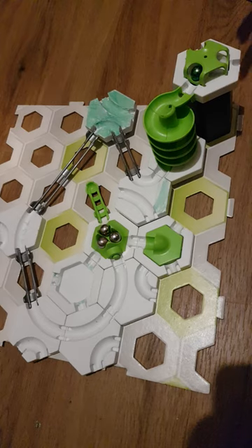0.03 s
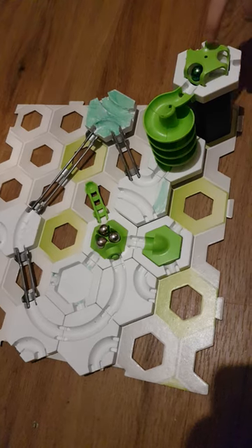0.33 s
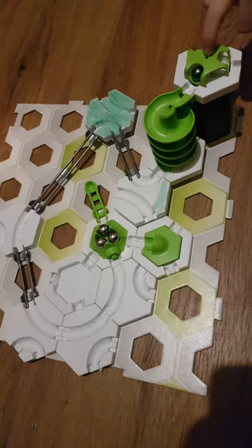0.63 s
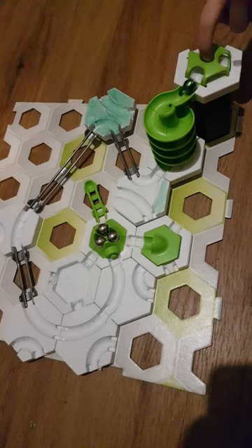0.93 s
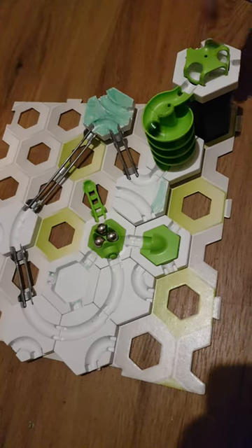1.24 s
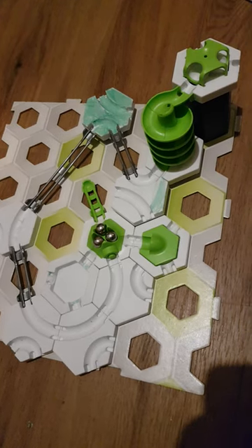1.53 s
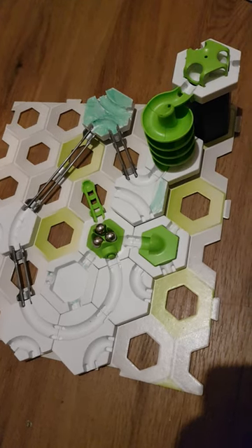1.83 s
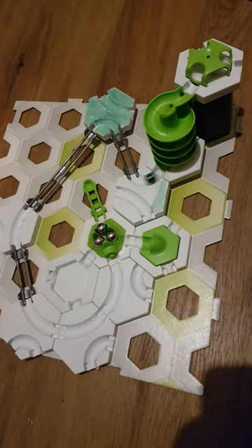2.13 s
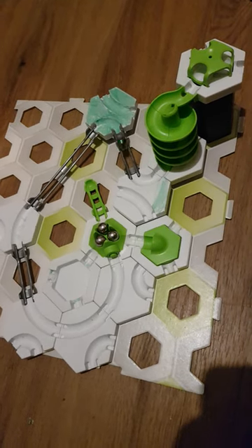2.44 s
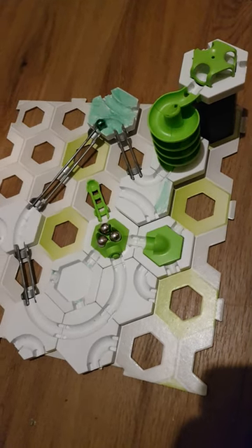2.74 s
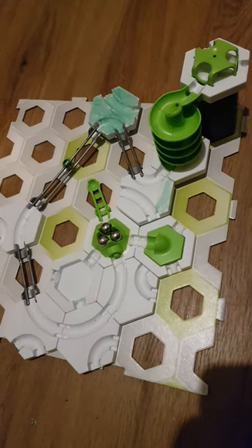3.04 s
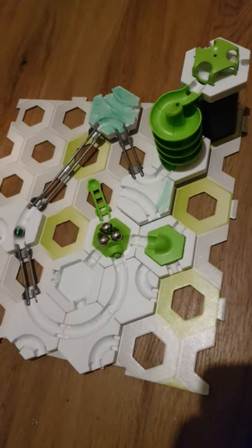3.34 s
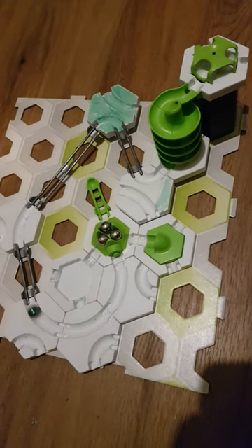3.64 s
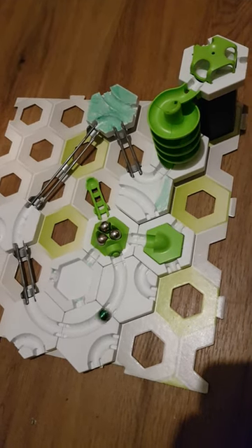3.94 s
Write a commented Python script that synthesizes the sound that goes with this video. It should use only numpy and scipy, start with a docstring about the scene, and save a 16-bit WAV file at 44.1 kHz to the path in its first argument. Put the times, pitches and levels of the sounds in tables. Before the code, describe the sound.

A marble runs through a plastic track. After a few faint launcher clicks it drops into a spiral, circles ever faster, clatters out, then rolls along metal rails and rumbles over hollow tiles, close by in a quiet room.

```python
"""A marble runs through a plastic marble track in a quiet room, close to a stereo microphone.
Over faint room tone, a finger clicks the launcher, a little left of centre. At 1.2 s the marble drops
into a spiral tower, circles down ever faster and clatters out. It climbs a short rail to a junction,
speeds down two pairs of metal rails from 3 s and rumbles on over hollow tiles, just right of centre.
Each knock rings the part it hits; the rolling is a stream of tiny bumps that ring the track too."""
import sys
import numpy as np
from scipy import signal
from scipy.fft import rfft, irfft
from scipy.io import wavfile
from scipy.ndimage import uniform_filter1d

SR = 44100
rng = np.random.default_rng(int(sys.argv[2]) if len(sys.argv) > 2 else 0)


def unload_audio(sound):
    """Save the sound as a 16-bit wav file, at the path given as the first command line argument."""
    columns = np.transpose(np.atleast_2d(sound))
    # keep every value between -1 and 1, then stretch to whole-number steps
    steps = np.round(np.clip(columns, -1, 1) * 32767)
    wavfile.write(sys.argv[1], SR, steps.astype(np.int16))


N = 176400

# Blows on each part of the track: start_s, relative_db, treble_db, bass_db, ring_t60_s
LAUNCHER_CLICKS = [(.799, -52.5, -30, -9, 0.042), (.886, -49, 2, 4, 0.031), (.9042, -35.5, -8, -5, 0.012),
                   (.9375, -44, 5, 10, 0.02), (.9517, -37, -3, 5, .018), (.9645, -38.5, -6, 5, 0.033),
                   (1.0085, -37.5, 5, -15.5, .025), (1.0265, -46.5, -6, 13, 0.053)]
RIM_KNOCKS = [(1.2128, -22.5, -6, 3.1, 0.008), (1.2140, -17, 8.5, 2.2, 0.017),
              (1.2163, -16.5, 1, 1.6, 0.018)]
SPIRAL_TICKS = [(1.3415, -40, 3, 6, .02), (1.3846, -32.5, -40, -14, .018), (1.5677, -39.5, 6, -3, .025),
                (1.621, -38.5, 22, 5, 0.03), (1.698, -39, 19, 10, 0.0095), (1.7515, -33.5, 21, 9, 0.026),
                (1.785, -34, -5, -10, 0.03), (1.7975, -36, 10, -18, 0.015), (1.8127, -29, 7, -8, 0.019),
                (1.8955, -34, 7, -11, 0.016), (1.9553, -27.5, 2, -2, 0.0095), (1.968, -34, 3, 0, 0.031),
                (2.0517, -32.5, 26, -11, 0.016), (2.069, -37, 12, 5, 0.017), (2.080, -29.5, -10, -20, .02),
                (2.106, -25.5, 10, -11, .022)]
EXIT_CLATTER = [(2.1548, -18, 7, 1, 0.037), (2.1628, -16.5, 0, -2, 0.036), (2.170, -31, -7, 1, 0.024),
                (2.1778, -19.5, 4, 5, 0.017), (2.1958, -17, 6, -6, 0.0083), (2.218, -28, -11, 2.5, 0.017),
                (2.2244, -21, -6, -1, 0.014), (2.272, -36, -16, 18, 0.015)]
JOINT_KNOCKS = [(2.3124, -28, 14, -10, 0.032), (2.325, -27, 3, -7, 0.017), (2.355, -42, 2, 11, 0.032),
                (2.410, -33.5, -6, -7, 0.046), (2.422, -35, 2, 2, .025), (2.434, -34, -18, -4, 0.039),
                (2.5055, -30.5, -3, -9, .018), (2.519, -31.5, 2, 0, 0.026), (2.531, -36, -18.5, -9, 0.025),
                (2.540, -34, 2, 0, 0.034), (2.575, -57, -2, 0, 0.017), (2.612, -35.5, -9, 0, .05),
                (2.670, -42.5, -13, 23, 0.014), (2.78, -49.5, -7, -2, .02), (2.806, -41, -7, 12, 0.033),
                (2.826, -36, -16, 19, .035), (2.8665, -33.5, 1, -4, 0.024), (2.871, -35, 7, -12, 0.016),
                (2.969, -44.5, 2, -9, 0.025), (2.9725, -32.5, 4, 10, 0.017), (3.114, -38.5, -8, 2, 0.027),
                (3.218, -42, 5, 16, 0.02), (3.258, -28.5, 11, 6, .028), (3.2825, -24.5, 15, 7, 0.034),
                (3.315, -26, -33, -7, 0.017), (3.4195, -28.5, -20, 14.5, 0.035),
                (3.4355, -35, -12, 17, 0.0075), (3.473, -28.5, -12.5, -3, .03),
                (3.5325, -26, 12, 14, 0.046), (3.642, -31, 5, 10, .025)]
TILE_KNOCKS = [(3.660, -27, -11, 6, 0.0094), (3.667, -27.5, 7, -8, 0.022), (3.690, -26, 9, -3, 0.074),
               (3.7595, -47, -7, -5, 0.024), (3.785, -31, -18, 9, .02), (3.8418, -19.5, 7, 2, .012),
               (3.850, -21, 9.5, -4, 0.011), (3.877, -36, 3, 6, .03), (3.968, -31, -19, 17, 0.024)]
# Rolling strength along the way: time_s, relative_db, treble_db
SPIRAL_ROLL = [(1.04, -72.5, -36), (1.2, -55.5, -9), (1.31, -59, -1), (1.38, -55.5, -1), (1.5, -52.5, -2.5),
               (1.58, -51.5, -2.5), (1.75, -51.5, 0), (1.86, -50.5, -1.5), (2.0, -49, 2),
               (2.09, -49.5, 1.5), (2.15, -50, -8)]
JUNCTION_ROLL = [(2.17, -53.5, -10), (2.26, -54, 15), (2.33, -56.5, -4), (2.39, -68, -6), (2.56, -66, 11),
                 (2.66, -58, 2), (2.76, -63.5, 4), (2.85, -53, -2), (2.96, -69, 14)]
RAIL_ROLL = [(2.97, -48.5, -0.5), (3.03, -58.5, -0.5), (3.105, -55.5, -2), (3.125, -51, -0.5),
             (3.2, -52, -2), (3.25, -49.5, 5), (3.32, -46.5, 6), (3.385, -44, -9.5), (3.43, -37, -6),
             (3.5, -51.5, 7), (3.55, -53.5, 4), (3.585, -51.5, 3.5), (3.65, -46, 0)]
RAIL_HISS = [(3.39, -69, 0), (3.425, -54, 0), (3.46, -50, 0), (3.53, -55, 0), (3.57, -71, 0)]
TILE_ROLL = [(3.655, -48.5, 2.4), (3.73, -46, 0.91), (3.78, -48, -0.62), (3.82, -49.5, -0.68),
             (3.88, -44.5, 0.36), (3.94, -48, -2.4), (3.97, -47, -3.1), (4.0, -49.5, -2.6)]
# A band that glides and swells, in the room tone or the roll: time_s, centre_hz, lift_db
THIN_TONE = [(.1, 2350, 6.5), (.22, 2330, -6), (.4, 2380, 3), (.68, 2380, 9), (.86, 2330, 13),
             (.95, 2330, -3)]
SPIRAL_SWIRL = [(1.36, 1670, 1), (1.42, 1830, 10), (1.49, 2850, 4), (1.55, 4950, 7.5), (1.6, 5300, 4),
                (1.63, 7650, 14.5), (1.75, 8700, -8), (1.86, 8700, 3.5), (2.05, 9800, 15)]
RAIL_SWIRL = [(3.1, 1550, 1), (3.29, 1800, 4), (3.317, 1910, 14.5), (3.35, 1620, 9), (3.43, 1700, 2.5),
              (3.48, 1600, -2)]
TILE_SWIRL = [(3.67, 1120, 11.6), (3.73, 1110, 5.7), (3.77, 1400, 9.8), (3.81, 1620, 10.5),
              (3.88, 880, 8.5), (3.98, 1070, 15.3)]
# Spectrum of the room tone and of each part, at the microphone: frequency_hz, relative_db
ROOM_TONE_COLOUR = [(15, -42), (28, -22), (53, -8.5), (92, -17.5), (145, -7.5), (212, -11.5), (330, -10.5),
                    (911, -14), (1650, -18), (2350, -19), (4870, -26.5), (11300, -32), (14800, -21.5),
                    (16000, -22.5)]
LAUNCHER_COLOUR = [(59, -63), (100, -37), (295, -15.5), (452, -4), (513, -12), (705, -5), (784, -13),
                   (970, -6), (1310, -10), (2000, -5), (2860, -13.5), (4380, -14.5), (4980, -10),
                   (6560, -21.5), (16000, -31)]
SPIRAL_COLOUR = [(60, -43), (130, -30), (300, -9.5), (660, -12), (1000, -6), (1270, -1.5), (1470, -3.5),
                 (1740, -1.5), (2970, -8.5), (3760, -6), (4120, -7.5), (5300, -9.5), (7230, -14.5),
                 (8120, -20.5), (13300, -27.5), (16000, -29)]
RIM_COLOUR = [(50, -40), (120, -24), (400, -15.5), (620, -25), (836, -10.5), (1060, -17.5), (1230, -13),
              (1480, -12.5), (3400, -7), (3700, -9.5), (4870, -6.5), (8000, -10.5), (10200, -17.5),
              (11200, -13), (16000, -10.5)]
EXIT_COLOUR = [(59, -63), (100, -36), (547, -21), (583, -13), (1130, -7.5), (1680, -1.5), (2040, -6.5),
               (2630, -6), (3470, -7.5), (5650, -10), (8830, -24), (12400, -21), (16000, -27)]
JUNCTION_COLOUR = [(59, -32), (100, -17), (210, -11), (373, -5.5), (461, -5), (535, -1.5), (818, -6),
                   (1520, 3), (2000, -15), (16000, -40)]
JOINT_COLOUR = [(50, -63), (110, -24), (415, -31.5), (768, -30.5), (900, -15.5), (1580, -6.5),
                (1870, -10.5), (2270, -6.5), (2800, -7.5), (6840, -14), (8640, -30.5), (12700, -30),
                (16000, -39)]
RAIL_COLOUR = [(50, -59), (110, -15), (283, -16.5), (400, -22), (691, -17), (1200, -16), (1550, -2.5),
               (1910, -13.5), (2270, -10.5), (3120, -12), (4470, -16), (5530, -22.5), (8280, -32.5),
               (12700, -36), (16000, -45)]
HISS_COLOUR = [(3000, -14), (10300, -13.5), (11500, -10), (12900, -1.5), (14400, -14), (15200, -16),
               (16000, -20)]
TILE_COLOUR = [(59, -41), (100, -27), (160, -13.5), (239, -22), (373, -17.5), (433, -23.5), (621, -10.5),
               (891, -13.5), (1080, -8.5), (1330, -10), (1450, -6.5), (2080, -18), (2690, -10), (4290, -28),
               (16000, -48)]
TILE_EDGE_COLOUR = [(59, -31), (100, -16.5), (471, -33), (991, -7.5), (1680, -1), (2130, -9.5), (2750, -10),
                    (3400, -14), (3860, -15.5), (5300, -23.5), (9820, -36), (12700, -34.5), (16000, -42)]
# Resonances that stand out of those spectra: pitch_hz, width_hz, lift_db
ROOM_WHINES = [(2320, 120, 3.5), (14300, 220, 0)]
LAUNCHER_MODES = [(610, 62, 5.5), (700, 54, 4), (1620, 160, 7.5), (3450, 300, 3.5), (5100, 300, 5)]
TOWER_MODES = [(1240, 93, 2.9), (1724, 120, 1.3), (1745, 34, 3.2), (2260, 96, 3.5), (2730, 90, 1.9),
               (3800, 98, 3.6)]
RIM_MODES = [(2270, 93, 7.1), (3434, 33, 10), (4940, 50, 13.2), (5400, 100, 4.5), (6200, 110, 6.6),
             (11200, 240, 5), (14500, 220, 4)]
TICK_MODES = [(1756, 110, 14.6), (3700, 100, 5.9), (5070, 290, 9.2), (7130, 250, 5.6), (8700, 350, 7.6)]
RAIL_MODES = [(530, 110, 5.2), (1454, 77, 5.5), (1566, 68, 4.5), (1770, 50, 5.2), (2250, 70, 5.8),
              (3820, 54, 3.5), (4600, 71, 6), (5400, 68, 2), (6600, 130, 2.7)]
TILE_MODES = [(1060, 200, 2.9), (1394, 18, 7.8), (1600, 110, 1.7), (1820, 170, 8.1), (2740, 150, 7.3),
              (3870, 50, 6.1)]
# Mains hum: pitch_hz, level_db
MAINS_HUM = [(50, -78.5), (150, -84.5)]
# The marble's place before the microphone: time_s, left_lead_samples, left_minus_right_db
MARBLE_PLACE = [(.9, 9, 2), (1.21, 6.5, 0.5), (1.7, 8.5, 1.5), (2.17, 5, 0.5), (2.87, 5, 0),
                (3.3, 1.5, 0.5), (3.66, -2.5, -1), (3.9, -1, 0)]
# The track's lean to one side: frequency_hz, left_minus_right_db
STEREO_LEAN = [(100, -4.5), (1000, 0.5), (2200, -1.5), (4500, -0.5), (9000, 3.5), (15000, 4)]
# How alike left and right are: frequency_hz, correlation (negative counts as 0)
ROOM_TONE_LIKENESS = [(60, 0.63), (240, 0.53), (950, -0.026), (3770, -0.07), (15000, -0.71)]
TRACK_LIKENESS = [(100, 1), (700, 0.89), (1600, 0.81), (4000, 0.48), (14000, 0.24)]
# Decay of the room: frequency_hz, t60_s
ROOM_DECAY = [(150, .3), (500, 0.57), (1400, 0.35), (3700, 0.36), (9000, 0.21), (15000, 0.24)]


def amp(db):
    """Decibels to gain."""
    return 10 ** (np.asarray(db) / 20)


def unit_rms(x):
    """Scales to rms 1."""
    return x / np.sqrt(np.mean(x ** 2) + 1e-20)


def at_hz(points, hz):
    """Reads a table on a log-frequency axis."""
    f, value = np.transpose(points)
    return np.interp(np.log(hz + 1), np.log(f + 1), value)


def resonances(modes, hz):
    """Gain of a set of resonant peaks, summed in power."""
    peaks = ((amp(abs(db)) ** 2 - 1) / (1 + (2 * (hz - f) / width) ** 2) for f, width, db in modes)
    return np.sqrt(1 + sum(peaks))


def stereo_pair(spectra, likeness, hz):
    """Makes two independent spectra partly alike, as at the two sides of the microphone."""
    shared = np.clip(at_hz(likeness, hz), 0, 1)
    return np.array([spectra[0], shared * spectra[0] + np.sqrt(1 - shared ** 2) * spectra[1]])


def swirl(x, curve, width_hz):
    """Lifts or dips one band of a sound; its pitch and strength follow a curve."""
    t = np.arange(N) / SR
    when, centre_hz, lift_db = np.transpose(curve)
    carrier = np.exp(2j * np.pi * np.cumsum(np.interp(t, when, centre_hz)) / SR)
    pole = np.exp(-np.pi * width_hz / SR)
    band = 2 * (carrier * signal.lfilter([1 - pole], [1, -pole], x / carrier)).real
    return x + (amp(np.interp(t, when, lift_db)) - 1) * band


def room_tone(noise_db=-68):
    """Faint room noise with mains hum; a thin tone swells in it during the first second."""
    hz, t = np.fft.rfftfreq(N, 1 / SR), np.arange(N) / SR
    white = stereo_pair(rfft(rng.standard_normal((2, N))), ROOM_TONE_LIKENESS, hz)
    noise = irfft(white * amp(at_hz(ROOM_TONE_COLOUR, hz)) * resonances(ROOM_WHINES, hz))
    hum = sum(amp(db) * np.sqrt(2) * np.sin(2 * np.pi * f * t) for f, db in MAINS_HUM)
    return swirl(amp(noise_db) * unit_rms(noise) + hum, THIN_TONE, width_hz=180)


def microphone(time_s, hz):
    """Left and right response to the marble's place: the nearer side hears it sooner and louder."""
    when, leads, pans_db = np.transpose(MARBLE_PLACE)
    lead = np.interp(time_s, when, leads)
    pan_db = np.interp(time_s, when, pans_db) + at_hz(STEREO_LEAN, hz)
    delay_s = np.maximum([[-lead], [lead]], 0) / SR
    return amp([pan_db / 2, -pan_db / 2]) * np.exp(-2j * np.pi * hz * delay_s)


def contact(time_s, colour, modes, ring_s, treble_db=0, bass_db=0, size=8192):
    """One touch of the marble, of energy 1: a noise burst stands for the track's dense, short modes."""
    attack_s, treble_hz, bass_hz = 0.00074, 4970, 794
    t, hz = np.arange(size) / SR, np.fft.rfftfreq(size, 1 / SR)
    envelope = (1 - np.exp(-t / attack_s)) * amp(-60 * t / ring_s)
    burst = rfft(rng.standard_normal((2, size)) * envelope)
    flattened = burst / np.sqrt(uniform_filter1d(abs(burst) ** 2, size=160, axis=1))
    shelves_db = treble_db * hz ** 2 / (hz ** 2 + treble_hz ** 2) + bass_db / (1 + (hz / bass_hz) ** 2)
    log_gain = np.log(amp(at_hz(colour, hz) + shelves_db) * resonances(modes, hz) + 1e-5)
    # Minimum phase: the part rings only after it is hit.
    body = np.exp(np.conj(signal.hilbert(np.r_[log_gain, log_gain[-2:0:-1]])))[:len(hz)]
    sound = irfft(stereo_pair(flattened, TRACK_LIKENESS, hz) * body * microphone(time_s, hz))
    fade = np.clip(2 - 2.5 * t / t[-1], 0, 1)
    return unit_rms(sound * fade) / np.sqrt(size)


def knocks(rows, colour, modes, gain_db):
    """Separate blows ring one part of the track."""
    mix = np.zeros((2, N))
    for start_s, db, treble_db, bass_db, ring_s in rows:
        blow = amp(db + gain_db) * contact(start_s, colour, modes, ring_s, treble_db, bass_db)
        span = mix[:, round(start_s * SR):][:, :blow.shape[1]]
        span += blow[:, :span.shape[1]]
    return mix


def launcher():
    """The plastic launcher clicks under a finger."""
    return knocks(LAUNCHER_CLICKS, LAUNCHER_COLOUR, LAUNCHER_MODES, gain_db=16)


def roll(curve, colour, modes, gain_db, bumps_per_s, spread_db, spots=9, split_hz=2100):
    """The marble hops over tiny bumps; each rings one of a few spots along its way."""
    when, db, treble_db = np.transpose(curve)
    t = np.arange(N) / SR
    hits = rng.random(N) < bumps_per_s / SR
    bumps = hits * amp(spread_db * np.minimum(rng.exponential(1, N), 3)) * rng.choice([-1, 1], N)
    bumps /= np.sqrt(abs(uniform_filter1d(bumps ** 2, size=1200)) + 1e-6)  # even out the power
    bumps *= amp(np.interp(t, when, db) + gain_db) * (t > when[0]) * (t < when[-1])
    spot_times = np.linspace(when[0], when[-1], spots)
    position = np.interp(t, spot_times, np.arange(spots)) + .5 * rng.standard_normal(N)
    spot = np.clip(np.round(position), 0, spots - 1)
    sound = np.zeros((2, N))
    for k, time_s in enumerate(spot_times):
        ring = contact(time_s, colour, modes, ring_s=0.032)
        sound += signal.oaconvolve((bumps * (spot == k))[None], ring, axes=1)[:, :N]
    lows = signal.sosfiltfilt(signal.butter(2, split_hz, fs=SR, output="sos"), sound + 1e-18)
    return lows + (sound - lows) * amp(np.interp(t, when, treble_db))


def spiral_tower():
    """The marble hits the rim, circles down with a swirl that rises as it speeds up, and clatters out."""
    drop = knocks(RIM_KNOCKS, RIM_COLOUR, RIM_MODES, gain_db=14.5)
    circling = roll(SPIRAL_ROLL, SPIRAL_COLOUR, TOWER_MODES, gain_db=0, bumps_per_s=900, spread_db=4.5)
    ticks = knocks(SPIRAL_TICKS, SPIRAL_COLOUR, TICK_MODES, gain_db=13.5)
    clatter = knocks(EXIT_CLATTER, EXIT_COLOUR, TOWER_MODES, gain_db=15)
    return drop + swirl(circling, SPIRAL_SWIRL, width_hz=460) + ticks + clatter


def junction():
    """A soft, dull roll up the short rail to the junction."""
    return roll(JUNCTION_ROLL, JUNCTION_COLOUR, TOWER_MODES, gain_db=-2.5, bumps_per_s=860, spread_db=3)


def metal_rails():
    """The marble knocks over joints and speeds down the ringing rails, with a brief high hiss."""
    joints = knocks(JOINT_KNOCKS, JOINT_COLOUR, RAIL_MODES, gain_db=12)
    rolling = roll(RAIL_ROLL, RAIL_COLOUR, RAIL_MODES, gain_db=-1.5, bumps_per_s=700, spread_db=4)
    hiss = roll(RAIL_HISS, HISS_COLOUR, [], gain_db=0, bumps_per_s=3000, spread_db=20)
    return swirl(joints + rolling, RAIL_SWIRL, width_hz=117) + hiss


def hollow_tiles():
    """Hollow tiles rumble under the marble and clack as it meets their edges."""
    rumble = roll(TILE_ROLL, TILE_COLOUR, TILE_MODES, gain_db=-2, bumps_per_s=580, spread_db=1.5)
    edges = knocks(TILE_KNOCKS, TILE_EDGE_COLOUR, TILE_MODES, gain_db=12)
    return swirl(rumble, TILE_SWIRL, width_hz=260) + edges


def room_echo(x, early_db=-5.5, early_t60_s=0.068, tail_db=-7.5, tail_rise_s=0.018, size=26000):
    """Quick reflections from the floor and the track, then the tail of a small room."""
    t = np.arange(size) / SR
    hz, frame_s, noise = signal.stft(rng.standard_normal((2, size)), SR, nperseg=256)
    decay = amp(-60 * frame_s / at_hz(ROOM_DECAY, hz)[:, None])
    tail = signal.istft(noise * decay, SR, nperseg=256)[1][:, :size] * np.minimum(t / tail_rise_s, 1)
    reflections = rng.standard_normal((2, size)) * (rng.random((2, size)) < .04)
    early = reflections * amp(-60 * t / early_t60_s) * (t > .002)
    echo = amp(early_db) * unit_rms(early) + amp(tail_db) * unit_rms(tail)
    return signal.fftconvolve(x, echo / np.sqrt(size), axes=1)[:, :N]


def scene():
    """The marble's whole run close up, with the room behind it."""
    run = launcher() + spiral_tower() + junction() + metal_rails() + hollow_tiles()
    return room_tone() + run + room_echo(run)


def record(dry, silence_s=.055, fade_s=.015, cutoff_hz=16000):
    """The microphone opens after a moment of silence; the top treble is cut steeply."""
    fade_in = np.clip((np.arange(N) / SR - silence_s) / fade_s, 0, 1)
    lowpass = signal.firwin(255, cutoff_hz, window=("kaiser", 8), fs=SR)
    return signal.oaconvolve(dry * fade_in, lowpass[None], "same")


dry = scene()
out = record(dry)
unload_audio(out)
```